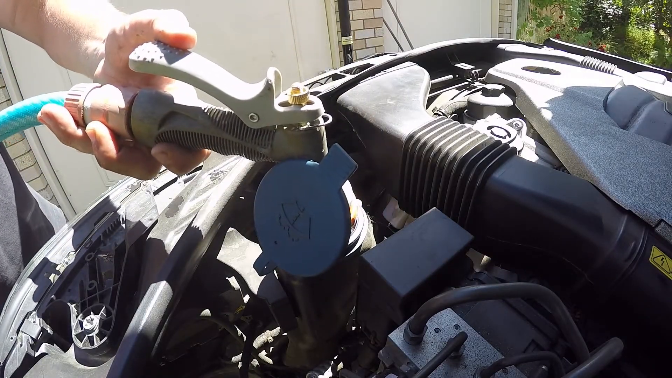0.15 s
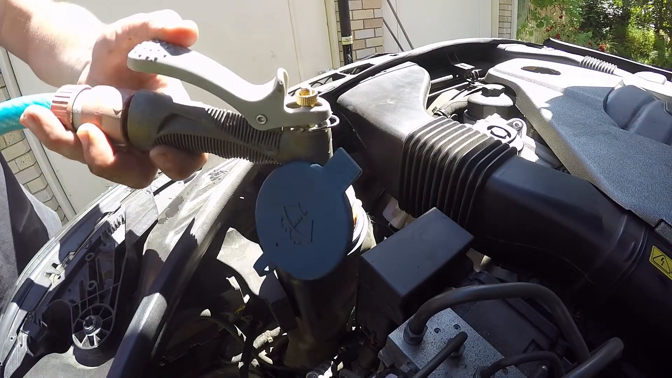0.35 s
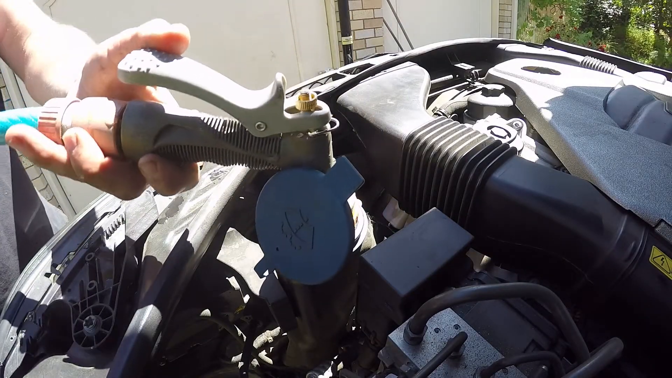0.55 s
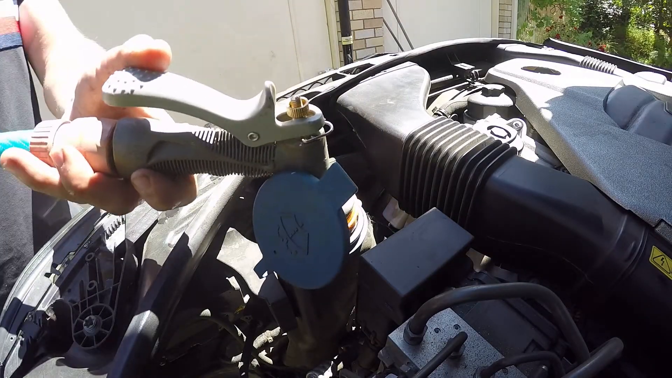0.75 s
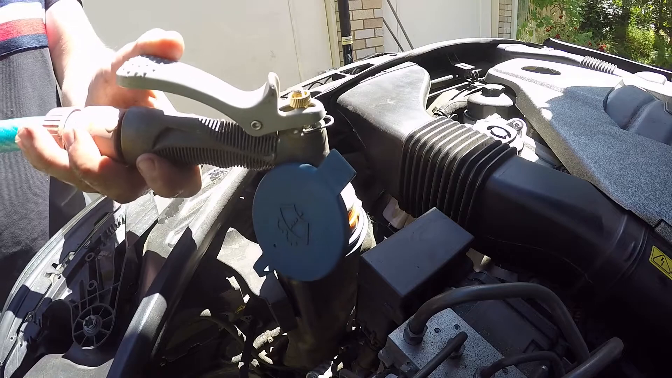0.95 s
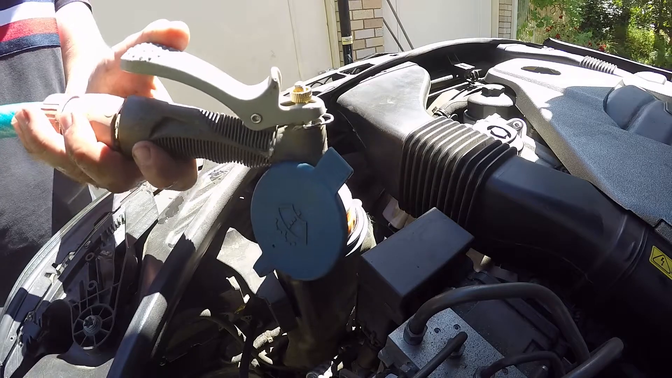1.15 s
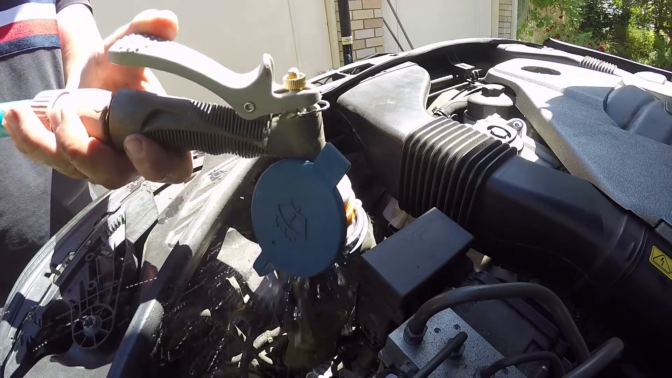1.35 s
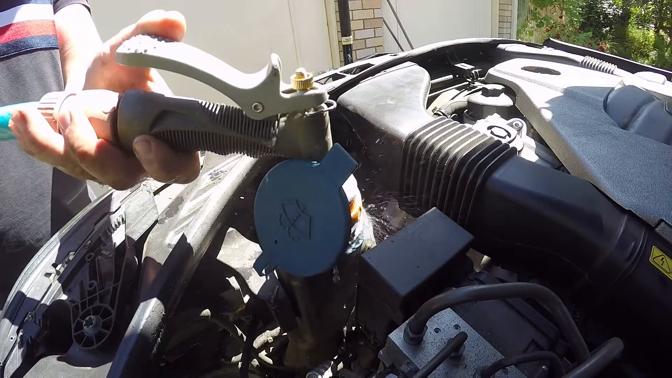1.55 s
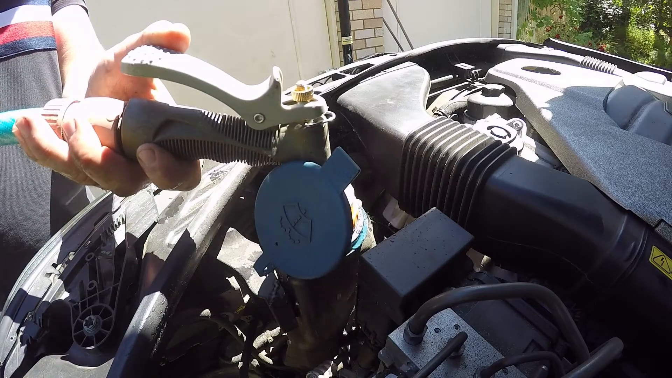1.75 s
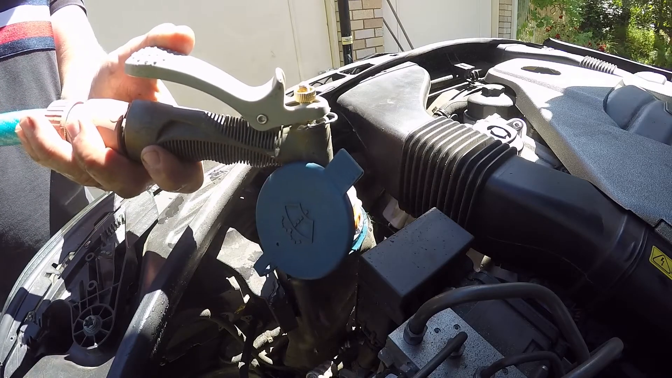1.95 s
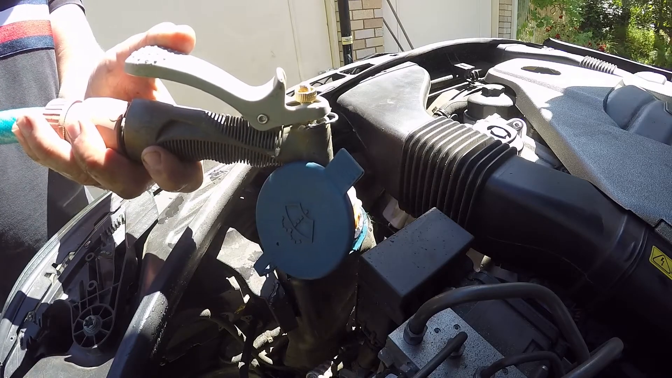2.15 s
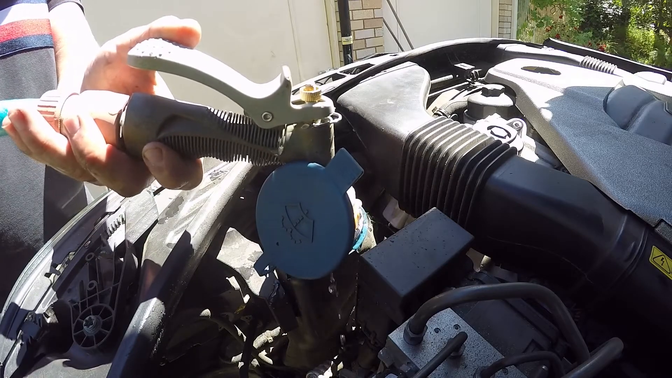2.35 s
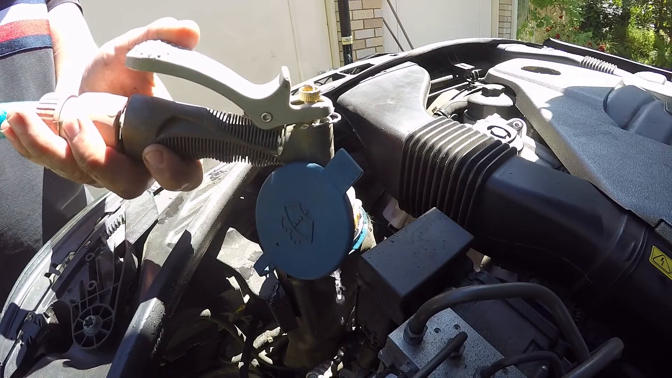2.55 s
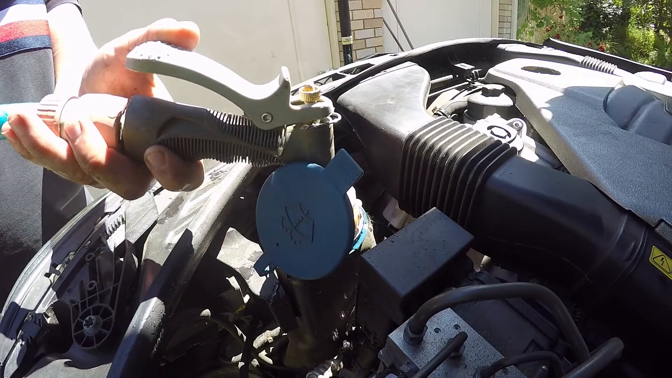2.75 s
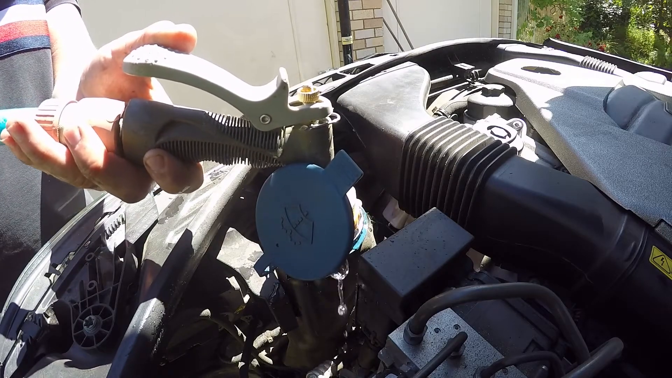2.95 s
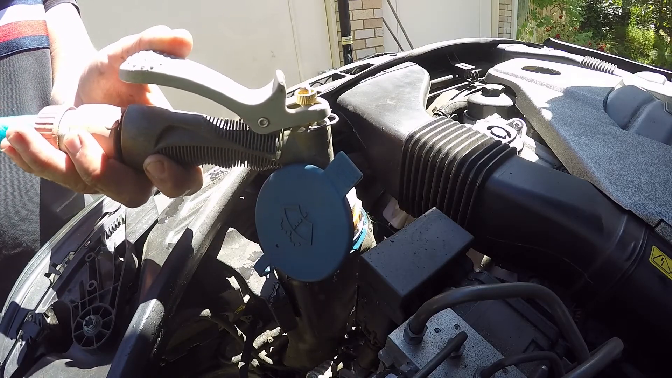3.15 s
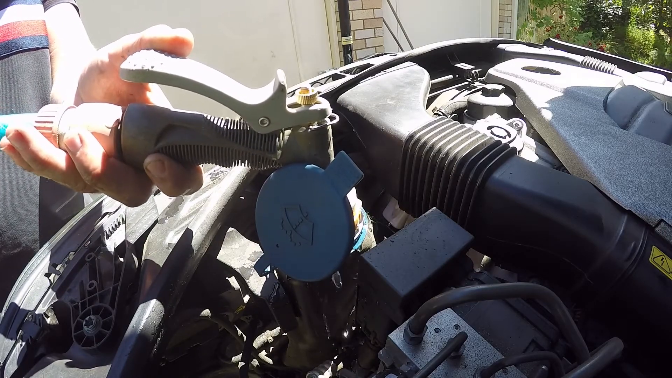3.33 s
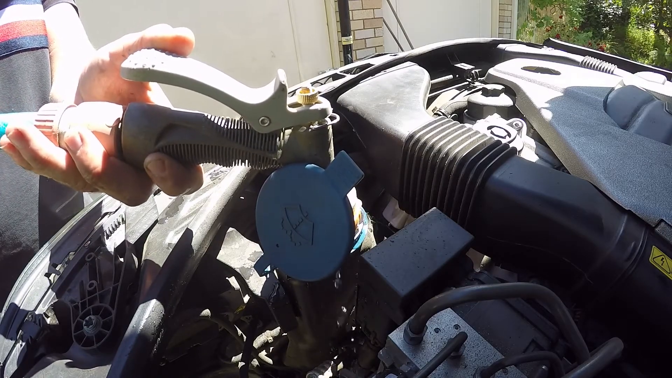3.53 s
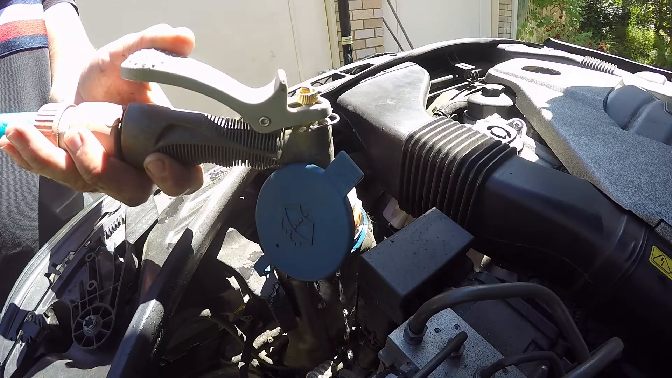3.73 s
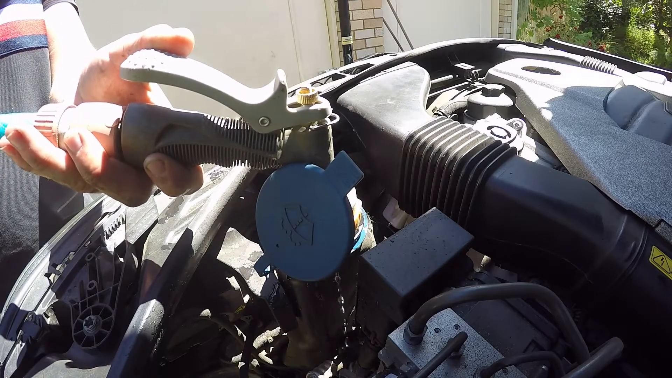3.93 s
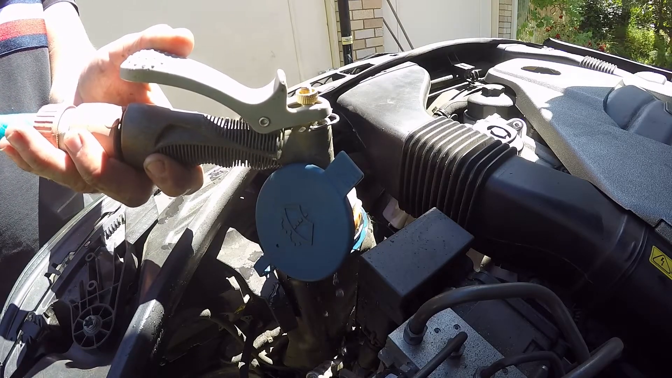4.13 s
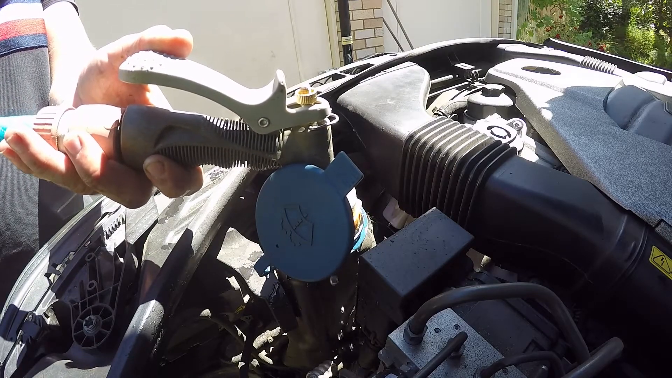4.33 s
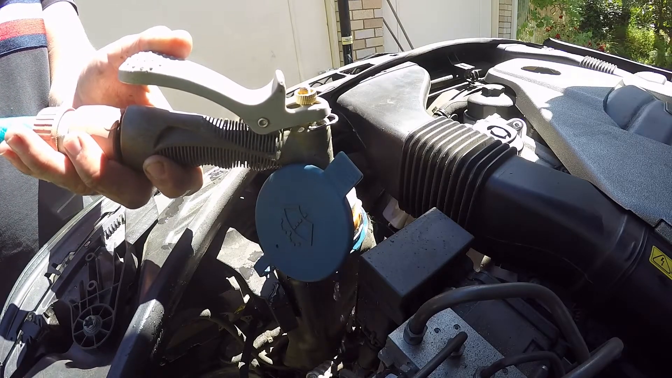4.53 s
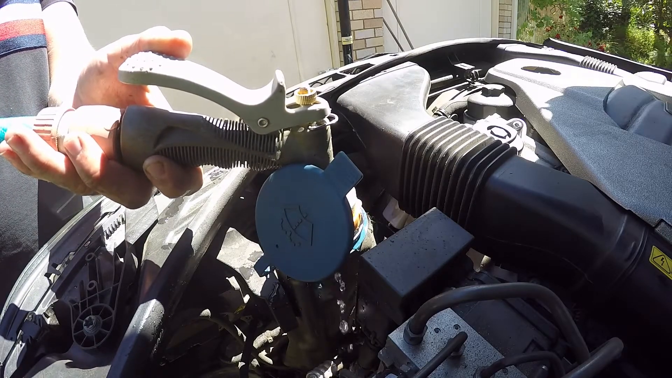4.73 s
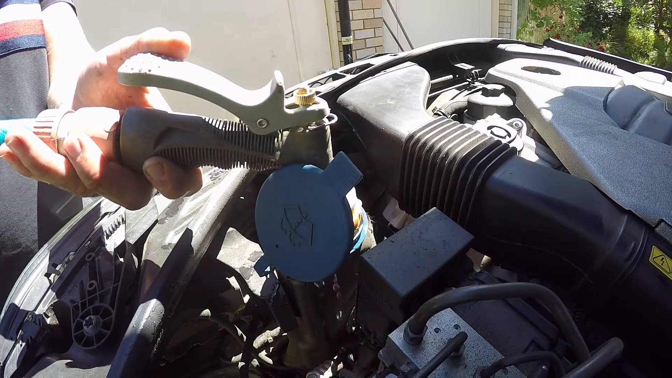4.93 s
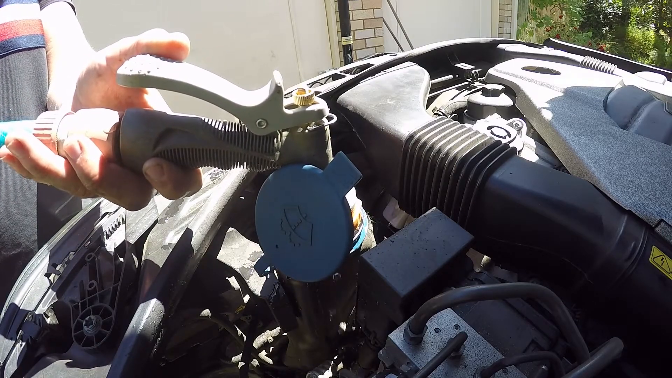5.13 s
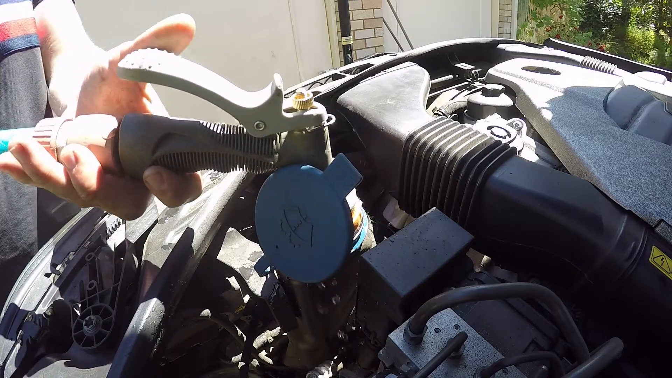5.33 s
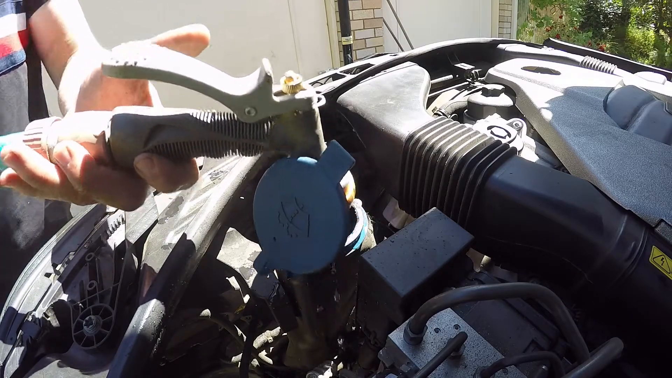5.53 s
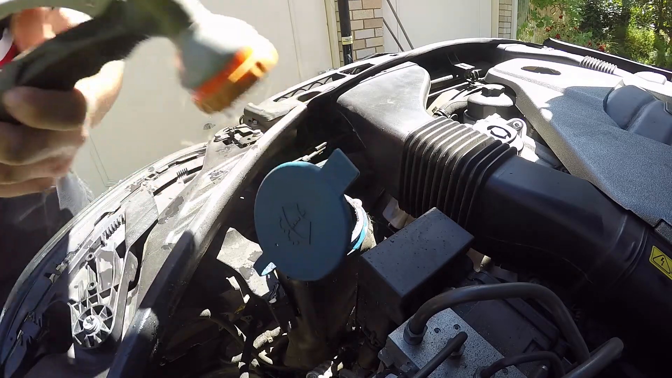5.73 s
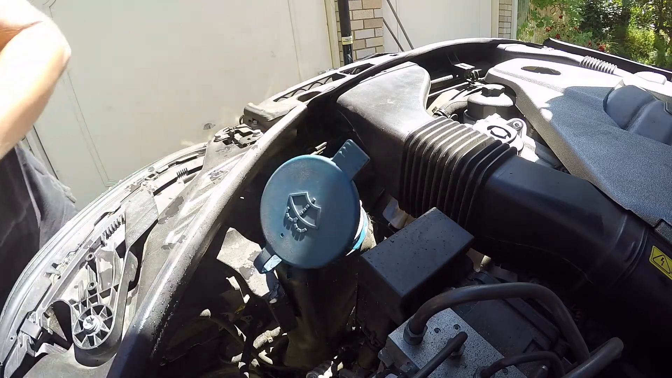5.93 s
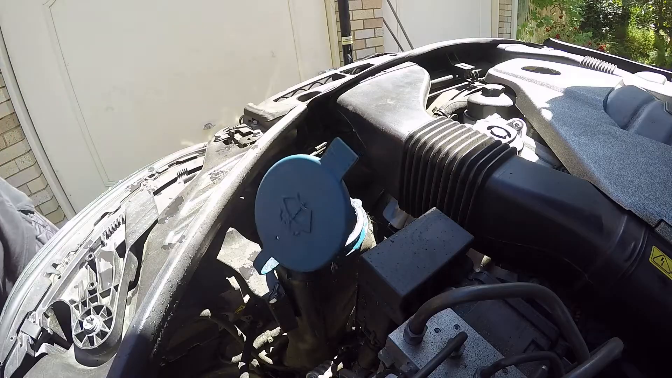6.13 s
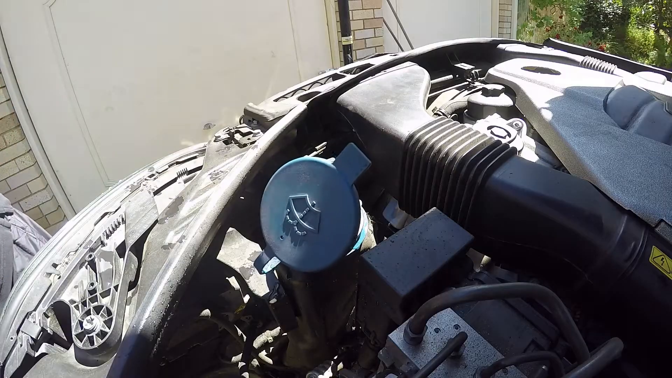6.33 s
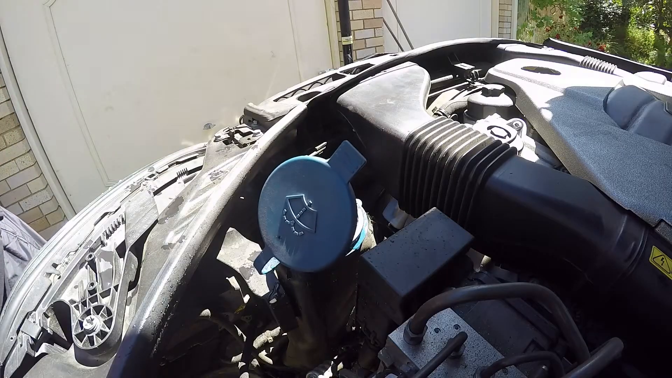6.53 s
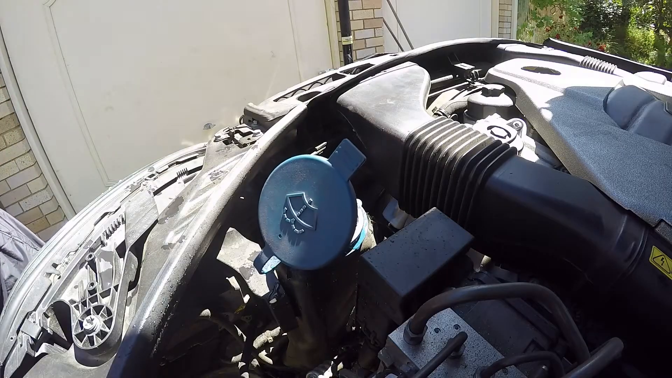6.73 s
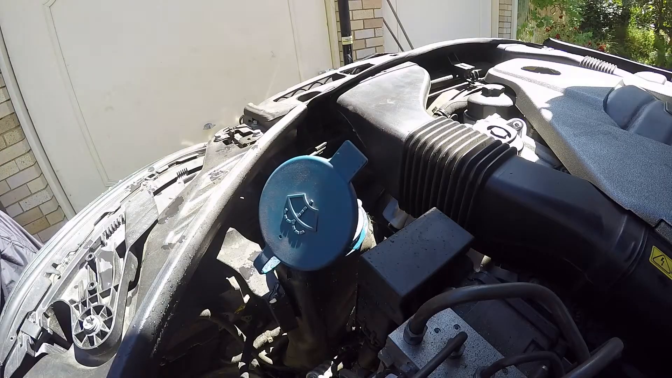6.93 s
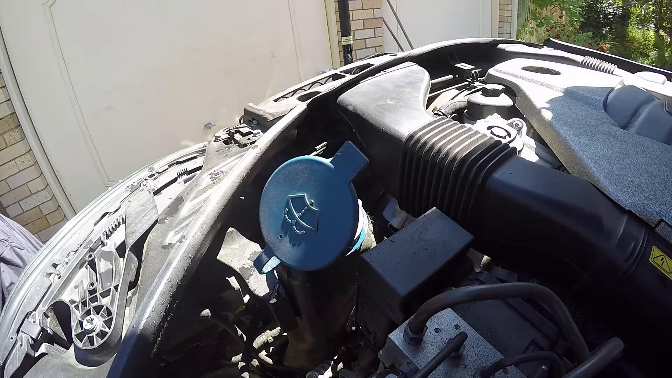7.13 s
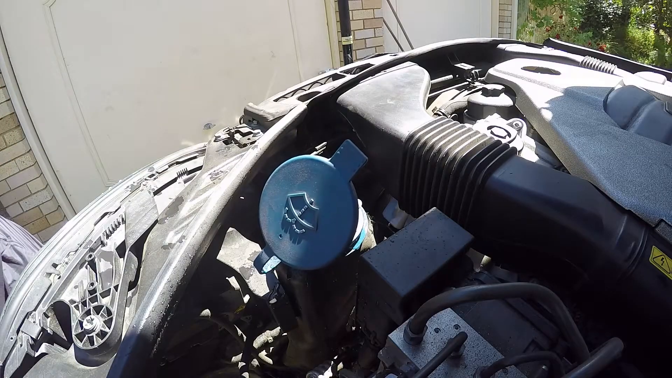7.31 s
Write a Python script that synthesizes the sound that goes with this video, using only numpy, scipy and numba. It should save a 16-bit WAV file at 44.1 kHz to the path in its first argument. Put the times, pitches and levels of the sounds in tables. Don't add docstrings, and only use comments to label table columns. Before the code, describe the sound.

Water hisses and bubbles down a narrow plastic neck, splashing loosely for a moment, then settling, then spitting brightly under more pressure. It cuts off abruptly with a short gulp, and the spray gun knocks and rattles against the tank while last drops patter. Near-silence remains: wavering low machine hum, a vehicle passing faintly, small bird chirps and a very faint cricket. Close small camera microphone, open yard, little echo.

```python
import sys
import numpy as np
from scipy import signal
from scipy.fft import rfft, irfft
from scipy.io import wavfile
from scipy.ndimage import uniform_filter1d
from numba import njit

SR = 44100
rng = np.random.default_rng(int(sys.argv[2]) if len(sys.argv) > 2 else 0)


def voltage_ratio(level):
    return 10 ** (np.asarray(level, float) / 20)


def digitize_waveform(pressure):
    field = np.atleast_2d(pressure).T
    bounded = np.clip(field, -1, 1)
    quanta = np.round(bounded * 32767).astype(np.int16)
    wavfile.write(sys.argv[1], SR, quanta)


N = 325017
TIME = np.arange(N) / SR

# frequency_hz, density_db
YARD = [(8.8, -35), (15, 1), (48, -5.5), (93, 2), (114, -6), (144, -12), (210, -14), (353, -19.5),
        (420, -21.5), (631, -27), (773, -26), (1690, -35.5), (4530, -37.5), (11800, -46), (15300, -50)]
# pitch_hz, drift_hz_per_s, trim_db, waver_db
HUM = [
    (100.54, -.36, -0.5, 1.26),
    (89.1, -.7, -0.4, 3),
]
# time_s, upper_db, lower_db
SWELL = [(0, -48, -62), (.3, -43.5, -46), (.8, -39.5, -53), (1.2, -41.5, -52), (1.4, -45.5, -52),
         (1.7, -41.5, -46), (2.3, -42.5, -49), (2.6, -44.5, -45.5), (2.95, -45, -43), (3.35, -40.5, -41),
         (3.8, -39, -45), (4.3, -46, -48), (4.7, -44, -44.5), (5.2, -42.5, -46), (5.55, -44.5, -40),
         (5.85, -58, -57), (6.6, -47.5, -47.5), (7.37, -45.5, -46)]
# time_s, firing_hz, level_db, upper_order_db
VEHICLE = [
    (3.8, 107, -70, -9),
    (4.3, 119.5, -63.5, 4),
    (4.8, 131.7, -53, -0.5),
    (5.2, 134, -63, -4),
    (5.5, 156, -50.5, -6),
    (5.7, 155, -67, -27),
    (6.2, 169.4, -60.5, -20),
    (7.37, 157, -78, -18),
]
# start_s, length_s, start_hz, end_hz, level_db
CHIRPS = [
    (5.526, 0.027, 2130, 2370, -57),
    (5.54, 0.021, 2350, 3000, -61),
    (6.37, 0.023, 2100, 2350, -61),
    (6.386, .012, 2350, 2750, -62),
    (6.452, .02, 2250, 2600, -67),
    (6.94, 0.04, 2020, 2860, -64),
]
# start_s, length_s, start_hz, end_hz, level_db
PEEPS = [
    (6.392, 0.013, 2764, 3150, -59),
    (6.968, 0.017, 2600, 3170, -58),
    (6.982, 0.024, 2700, 3550, -57),
    (6.984, 0.012, 4100, 4400, -55),
    (7.004, 0.0082, 4380, 4700, -61),
    (7.116, .022, 2250, 2550, -61),
    (7.135, .02, 2600, 2950, -65),
    (6.97, 0.015, 5300, 6200, -55),
]
# centre_hz, width_hz, level_db
WINGS = [(8600, 1900, -1), (12000, 2600, 1)]
# time_s, level_db
DRAG = [
    (5.93, -75),
    (6.0, -60),
    (6.1, -66),
    (6.16, -65),
    (6.22, -61),
    (6.3, -68),
]
# centre_hz, width_hz, level_db
DRAG_BODY = [(556, 290, 1), (850, 250, 1), (1600, 500, -6)]
# start_s, peak_db, pitch_hz, crack_db, tank_blow_db
KNOCKS = [(5.6032, -33.5, 1190, -1, -13), (5.6061, -27, 1510, -14, -14), (5.6437, -34, 2200, -1, -16),
          (5.7322, -33, 1350, 2, -7), (5.757, -34.5, 1340, -2, -13), (5.778, -40, 1280, -10, -7),
          (5.861, -36, 1100, -11, -14), (5.8663, -41, 1290, -10, -21), (5.741, -34, 1330, -20, -14),
          (5.747, -33, 1320, -20, -14), (5.787, -44, 1240, -20, -11), (5.65, -37, 2050, -15, -18),
          (6.221, -47, 1290, 9, -5), (6.227, -46, 1350, -6, -10)]
# start_s, peak_db, pitch_hz
TICKS = [(5.52, -41, 6190), (5.54, -46, 6500), (5.5644, -45, 5440), (5.5844, -41, 5530), (5.63, -45, 7200),
         (5.658, -36.5, 7000), (5.8172, -41, 5800), (5.847, -52, 5900), (5.9636, -41.5, 5960),
         (6.0147, -44, 8200), (6.0544, -56, 13160), (6.2198, -50, 7500), (6.2205, -52, 13000),
         (6.23, -54, 13500), (6.282, -55, 13000), (6.33, -60, 9500), (5.685, -50, 9500), (5.722, -50, 6000),
         (5.75, -47, 6500), (5.8, -45, 6000), (6.2314, -49, 5980), (6.2894, -53, 13400),
         (6.7715, -41, 6700), (6.773, -43, 13000), (6.7844, -45, 11500), (6.8, -56, 11000)]
# start_s, peak_db, pitch_hz
DROPS = [(5.490, -40, 1990), (5.4979, -33.5, 4100), (5.520, -49, 2000), (5.5691, -37, 2600),
         (5.571, -37, 4950), (5.588, -43, 3600), (5.610, -48, 3000), (5.655, -37, 2080),
         (5.6823, -35, 3750), (5.690, -42, 3700), (5.7324, -35, 3020), (5.745, -45, 4000),
         (5.7572, -42, 3200), (5.775, -42, 2200), (5.7771, -32, 4600), (5.8005, -38, 2670),
         (5.810, -44, 2600), (5.825, -41, 2600), (5.8904, -38.5, 4630), (5.9036, -36, 2220),
         (5.912, -42, 1700), (5.9637, -45, 2600), (6.1475, -38, 3870), (6.1887, -48, 1750),
         (6.0148, -47, 1100), (5.9627, -47, 1050), (5.62, -44, 1400), (5.665, -44, 1700),
         (5.635, -45, 3900), (5.835, -46, 2700), (6.155, -48, 2400), (6.2103, -36, 4900),
         (6.2213, -38, 3000), (6.228, -39, 2800), (6.2355, -45, 3200)]
# start_s, peak_db, pitch_hz, t60_s
CLUNKS = [(5.866, -40.5, 1000, .06), (5.867, -39, 465, .13), (5.867, -44, 382, .1), (5.872, -37, 641, .09),
          (5.872, -46, 830, .08), (5.895, -48, 630, .1), (5.735, -43, 463, .08), (5.604, -42, 960, .04),
          (5.862, -47, 1700, .07), (5.742, -42, 460, .07), (5.9, -48, 450, .08)]
# centre_hz, width_hz, level_db
TANK = [(458, 60, 5), (635, 50, -2), (950, 140, -5), (1330, 93, -6.5), (1690, 90, -3), (2230, 120, -20)]
# after_valve_s, length_s, start_hz, end_hz, peak_db
GULP = [
    (.0005, .008, 1480, 1280, -26),
    (.0055, .0085, 960, 860, -24.5),
    (.002, .014, 560, 500, -36),
]
# time_s, jet_db, dragged_air_db
FLOW = [(0.0, -42.5, 3), (0.5, -42.5, -4), (0.68, -41.5, -2.5), (0.93, -40.5, 0), (1.18, -42, -3),
        (1.31, -38, -4.5), (1.55, -39, -1.5), (1.66, -38, -4), (1.72, -40, 0), (1.98, -41.5, -7.5),
        (2.15, -42.5, -16), (2.46, -41.5, -23), (2.55, -42, -15), (3.15, -42, -5), (3.42, -42, 7),
        (3.6, -41, 0.5), (5.3, -42, -2.5), (5.46, -44.5, 7.5)]
# time_s, level_db
DREGS = [
    (5.47, -49),
    (5.724, -52.5),
    (5.906, -56),
    (6.0, -62),
    (6.18, -62),
    (6.22, -52),
    (6.28, -66),
]
# centre_hz, width_hz, level_db
NECK = [(1854, 240, 2), (2220, 96, 0.5), (2600, 39, 3.5), (2975, 124, 3), (3137, 270, 2), (3910, 120, 0),
        (4405, 210, 2), (6550, 470, -3), (7200, 1060, -6.5)]
# centre_hz, width_hz, level_db
NOZZLE = [(4400, 360, 8.5), (5130, 130, 4), (6420, 180, 0), (7340, 260, 5), (8200, 220, 2), (8700, 130, 1),
          (9860, 150, -2), (10780, 220, 2.5), (12100, 250, -1), (12500, 350, -3), (13430, 150, -1),
          (14150, 300, -1), (14500, 150, -3), (14950, 500, -7)]
# centre_hz, width_hz, level_db
CRACKLE = [(10600, 5900, 0)]
# frequency_hz, density_db
JET = [(180, -53), (300, -27.5), (390, -8), (754, -11.5), (1340, -11.5), (3100, -12.5), (3660, -14.5),
       (4380, -12.5), (12000, -23), (15300, -31)]
# time_s, first_hz, second_hz, second_over_first_db
AIR = [
    (0, 424, 850, -1),
    (.5, 390, 903, 6.5),
    (.6, 390, 810, 7.5),
    (1.05, 360, 820, 2),
    (1.28, 410, 850, 0),
    (1.7, 436, 862, 2),
    (2.1, 453, 860, 11.5),
    (3.4, 505, 920, -0.5),
    (5.46, 500, 890, -2),
]
# time_s, pitch_hz, trim_db
THIRD = [(0, 1340, 2), (.15, 1300, 1), (.35, 1330, -0.5), (.6, 1330, -3), (.95, 1340, -1), (1.2, 1340, -8),
         (1.3, 1235, 2), (1.6, 1240, -1), (1.9, 1310, -1), (2.2, 1340, 1.5), (2.9, 1334, -0.5),
         (3.25, 1336, 0.5), (3.42, 1330, 1.5), (3.6, 1323, 1), (4.2, 1344, 2), (4.6, 1337, -1),
         (5.1, 1335, -1), (5.46, 1320, 0)]
# start_s, peak_db, pitch_hz
BUBBLES = [(0.168, -33.5, 1254), (.192, -35, 1230), (.2, -37, 870), (0.237, -38, 887), (.245, -42, 1270),
           (.275, -38, 878), (0.398, -36, 930), (.53, -45, 920), (0.585, -43, 830), (.645, -35, 782),
           (0.715, -36, 1310), (.775, -34, 854), (0.868, -37, 860), (0.905, -41, 1430), (.99, -40, 794),
           (1.008, -43, 1360), (1.071, -38, 1330), (1.142, -41, 970), (1.435, -41, 1280),
           (1.721, -36, 1540), (1.87, -43, 1260), (1.33, -40, 423), (1.385, -43, 433), (1.45, -39, 430),
           (1.66, -38, 440), (1.75, -39, 400), (1.52, -39, 423), (1.575, -39, 428), (1.615, -36, 442),
           (1.262, -37, 1280), (1.41, -39, 1230)]
# start_s, length_s, start_hz, end_hz, peak_db
POCKETS = [
    (2.1335, .008, 2180, 1420, -25.5),
    (2.140, .008, 1320, 1900, -30),
    (2.1405, .004, 1800, 2350, -32),
    (1.928, .011, 2450, 2750, -36),
    (3.86, .008, 480, 760, -34),
    (2.136, .008, 1300, 1050, -36),
]
# start_s, peak_db
SPITS = [(3.4907, -31), (3.5142, -31), (3.522, -32), (3.532, -34), (3.571, -33), (3.63, -35), (3.865, -34),
         (3.5501, -30), (3.579, -31), (3.597, -33), (3.6623, -36), (3.6713, -35), (3.7122, -35),
         (3.7257, -33), (3.7841, -37), (3.834, -35), (3.8469, -33), (3.8754, -32), (3.9377, -32),
         (3.9716, -34), (4.024, -33), (4.057, -30), (4.1318, -36), (4.1926, -32), (4.2131, -34),
         (4.24, -33), (4.269, -37), (4.3378, -34), (4.3807, -35), (4.496, -34), (4.6391, -33),
         (4.7519, -33), (4.7738, -31), (4.8192, -34), (4.8551, -39), (4.8671, -35), (4.8856, -30),
         (4.9544, -37), (4.9634, -34), (5.0048, -31), (5.0367, -30), (5.0721, -35), (5.1485, -34),
         (5.1924, -33), (5.2188, -34)]
# start_s, peak_db, pitch_hz, width_over_pitch
SPLASHES = [(.049, -26, 8400, 0.65), (0.117, -26.5, 8900, .7), (.387, -31.5, 2500, 0.56),
            (.912, -30, 2260, .3), (.954, -32, 3750, 0.3), (1.009, -35, 9000, .8), (1.511, -33, 1510, 0.16),
            (1.627, -33, 1700, 0.08), (1.57, -35, 2650, .12), (1.605, -34, 2600, .15),
            (1.651, -27, 4000, 0.4), (1.655, -34, 2230, .15), (2.15, -37, 1500, 0.33),
            (2.465, -34, 5250, 0.31), (3.671, -28, 8300, 0.5), (1.53, -35, 4400, 0.13),
            (1.612, -28, 4500, .3), (1.661, -28.5, 3400, 0.27), (1.675, -29, 4300, .25),
            (1.31, -37, 2950, .12), (.69, -36, 2170, 0.13), (.73, -37, 1800, .2), (.745, -37, 2670, 0.13),
            (0.802, -36, 2600, 0.13), (.855, -38, 2600, 0.14), (.87, -37, 2000, .2), (.515, -39, 3000, .12)]

SPILL_S, SPILL_END_S, TRIGGER_S, VALVE_S = 1.25, 1.93, 3.43, 5.4603
SPILL_DB = -2


def level(x, db):
    return x * voltage_ratio(db) / np.sqrt(np.mean(x ** 2))


def curves(table):
    s, *columns = np.transpose(table)
    inside = 1. * ((TIME >= s[0]) & (TIME <= s[-1]))
    gate = uniform_filter1d(inside, size=200, mode="nearest")
    return [np.interp(TIME, s, c) for c in columns] + [gate]


@njit
def svf(x, hz, width):
    y, b, l = np.empty(len(x)), 0., 0.
    for i in range(len(x)):
        g, k = np.tan(np.pi * hz[i] / SR), width / hz[i]
        v = (b + g * (x[i] - l)) / (1 + g * (g + k))
        b, l, y[i] = 2 * v - b, l + 2 * g * v, k * v
    return y


def ring(x, modes):
    out = 0
    for k, (hz, width, db) in enumerate(modes):
        out = out + (-1) ** k * voltage_ratio(db) * svf(x, np.full(len(x), 1. * hz), 1. * width)
    return out


def colour(x, spectrum):
    hz, db = np.transpose(spectrum)
    grid = np.log(np.arange(N // 2 + 1) * SR / N + 1)
    return irfft(rfft(x) * voltage_ratio(np.interp(grid, np.log(hz), db)), N)


def walk(rate):
    k = int(SR / rate)
    held = np.repeat(rng.standard_normal(N // k + 1), k)
    return 1.322 * uniform_filter1d(uniform_filter1d(held, k), k)[:N]


def droplets(share, spread_db, tail_s):
    when = rng.random(N)
    size = voltage_ratio(spread_db * np.minimum(rng.exponential(size=N), 5))
    power = signal.lfilter([1], [1, -np.exp(-1 / (tail_s * SR))], (when < share) * size ** 2)
    return level(np.sqrt(power) * rng.standard_normal(N), 0)


def add(out, s, sound):
    i = int(s * SR)
    out[i:i + len(sound)] += sound[:N - i]


def burst(hz, t60, width):
    t = TIME[:8192]
    centre = min(hz, 15e3) + 0 * t
    contact = 1 + 1.6 * np.exp(-t / 0.00013)
    push = rng.standard_normal(len(t)) * voltage_ratio(-60 * t / t60) * contact
    x = svf(svf(push, centre, width * hz), centre, width * hz)
    return x / np.abs(x).max()


def glide(length, from_hz, to_hz, bend):
    hz = to_hz + (from_hz - to_hz) * np.linspace(1, 0, int(length * SR)) ** bend
    return 2 * np.pi * np.cumsum(hz) / SR, np.hanning(len(hz))


def yard():
    air = colour(rng.standard_normal(N), YARD)
    above = signal.sosfilt(signal.butter(4, 120, "high", fs=SR, output="sos"), air)
    return air * voltage_ratio(-52.5 + 0.14 * walk(4.0)) / np.std(above)


def tone(hz, db, waver_db):
    pitch = hz * (1 + 0.00965 * walk(7.3))
    phase = 2 * np.pi * np.cumsum(pitch) / SR
    return np.sqrt(2) * np.sin(phase) * voltage_ratio(db + waver_db * walk(5.5))


def machine():
    upper_db, lower_db, _ = curves(SWELL)
    out = tone(26.3 + 0 * TIME, -52, 2.5)
    for (hz, drift, trim_db, waver_db), swell_db in zip(HUM, (upper_db, lower_db)):
        out += tone(hz + drift * TIME, trim_db + swell_db, waver_db)
    return out


def vehicle():
    hz, db, upper_db, gate = curves(VEHICLE)
    firing = rng.standard_normal(N)
    lower = level(svf(firing, hz, 4.3), 0)
    upper = level(svf(firing, 1.515 * hz, 11.0), 0)
    return (lower + voltage_ratio(upper_db) * upper) * voltage_ratio(db) * gate


def cricket():
    start_s, every_s = 6.464, .2036
    since = (TIME - start_s) % every_s
    rasp = np.exp(-since / .04) * (1 - np.exp(-since / .01)) * (TIME > start_s) * voltage_ratio(.8 * walk(60))
    strokes = ring(ring(droplets(0.079, 1.9, 0.0011), WINGS), WINGS)
    return level(strokes * rasp, -81)


def birds():
    out = np.zeros(N)
    for notes, octave_db in ((CHIRPS, 4.5), (PEEPS, -20)):
        for s, length, from_hz, to_hz, db in notes:
            phase, window = glide(length, from_hz, to_hz, .75)
            voice = np.sin(phase) + voltage_ratio(octave_db) * np.sin(2 * phase)
            add(out, s, voltage_ratio(db) * window ** .6 * voice)
    out = out * voltage_ratio(-1.5) * (1 + .3 * walk(500))
    t = TIME[:4000]
    leaves = rng.standard_normal(len(t)) * np.exp(-t / .025) * (t > .008)
    return out + voltage_ratio(-8) * signal.fftconvolve(out, leaves / np.linalg.norm(leaves))[:N]


def drag():
    db, gate = curves(DRAG)
    return level(ring(droplets(0.0092, 2, .006), DRAG_BODY), 0) * voltage_ratio(db) * gate


def clunk(hz, t60):
    t = TIME[:16384]
    return np.sin(2 * np.pi * hz * t) * (1 - np.exp(-t / 0.001)) * voltage_ratio(-60 * t / t60)


def gun():
    out, blows = np.zeros(N), np.zeros(N)
    add(out, VALVE_S, voltage_ratio(-21.5) * burst(1200, 0.036, 2.9))
    for s, db, hz, crack_db, tank_db in KNOCKS:
        body = 0.56 * burst(hz, 50 / hz, 0.24)
        add(out, s, voltage_ratio(db) * (body + voltage_ratio(crack_db) * burst(2500, 0.016, 1.3)))
        blow = 0.33 * burst(620, 0.063, 3.5) + 2.9 * np.exp(-TIME[:8192] / 0.00013)
        add(blows, s, voltage_ratio(db + tank_db + 10.5) * blow)
    for s, db, hz in DROPS:
        add(out, s, voltage_ratio(db - 5.5) * (burst(hz, 0.034, 0.25) + 0.5 * burst(hz, 0.016, 1.5)))
    for s, db, hz in TICKS:
        add(out, s, voltage_ratio(db - 1.5) * burst(hz, 0.044, 0.66))
    for s, db, hz, t60 in CLUNKS:
        add(out, s, voltage_ratio(db) * clunk(hz, t60))
    return out + ring(blows, TANK)


def bay(near):
    t = TIME[:6000]
    echoes = rng.standard_normal(len(t)) * voltage_ratio(-60 * t / 0.22) * (t > .002)
    return near + voltage_ratio(-35.5) * signal.fftconvolve(near, echoes)[:N]


def gulp():
    out = np.zeros(N)
    for after, length, from_hz, to_hz, db in GULP:
        phase, window = glide(length, from_hz, to_hz, 1)
        add(out, VALVE_S + after, voltage_ratio(db) * np.sin(phase) * window ** .5)
    return out


def dregs():
    db, gate = curves(DREGS)
    run = ring(droplets(.02, 2.5, .004), [(1500, 1500, 0), (4200, 3000, -5)])
    patter = ring(droplets(0.0045, 2.2, 0.0022), [(2300, 2200, -1), (4300, 1500, 1.0), (7000, 3000, -10)])
    out = level(run, -5.5) * voltage_ratio(db + 2.5 * walk(30)) * gate
    return out + level(patter, -10.5) * voltage_ratio(db) * gate


def hiss(loose):
    neck = level(ring(droplets(0.033, 0.5, 0.0012), NECK), -4.0)
    jet = level(colour(droplets(0.033, 0.95, 0.0019), JET), -0.11)
    return neck * voltage_ratio(1.28 + SPILL_DB * loose) + jet


def gurgle():
    first_hz, second_hz, second_db, _ = curves(AIR)
    bubbles = droplets(0.03, .9, 0.01)
    first = svf(svf(bubbles, first_hz, 200.0), first_hz * (1 + 0.019 * walk(12)), 72.0)
    second = svf(svf(bubbles, second_hz, 210.0), second_hz * (1 + 0.021 * walk(15)), 73.0)
    extra_hz = 1030 + 0 * TIME
    extra = svf(svf(bubbles, extra_hz, 150.0), extra_hz, 58.0)
    early = np.clip(SPILL_END_S + .5 - TIME, 0, 1)
    return level(first - voltage_ratio(second_db) * second + voltage_ratio(1.0) * early * extra, -4.5)


def piping(third_hz):
    breath = svf(droplets(0.067, 0.5, 0.0079), third_hz, 320.0)
    return level(svf(breath, third_hz * (1 + 0.0063 * walk(9)), 150.0), -1.56)


def spit(hard):
    singing = level(ring(droplets(0.015, 2.1, 0.0021), NOZZLE), -3.5)
    crackle = level(ring(ring(droplets(0.0037, 1.9, 0.00058), CRACKLE), CRACKLE), -8.5)
    spray = level(ring(droplets(0.018, 3.6, 0.0014), [(9900, 16000, 0)]), -5.5)
    return hard * (singing + crackle) + (1 - 0.64 * hard) * spray


def stream():
    jet_db, air_db, gate = curves(FLOW)
    third_hz, third_db, _ = curves(THIRD)
    slide_s = .12
    loose = np.clip(np.minimum(TIME - SPILL_S, SPILL_END_S - TIME) / slide_s + .5, 0, 1)
    hard = np.clip((TIME - TRIGGER_S) / 0.036, 0, 1)
    piping_db = -4.5 + 0.26 * air_db + 0.5 * hard + SPILL_DB * loose + third_db
    opening_db = 5 * np.exp(-(TIME / 0.27) ** 2)
    weakening = (1 - hard) * np.clip((TIME - SPILL_END_S) / (TRIGGER_S - SPILL_END_S), 0, 1)
    spit_db = -4.5 + 0.23 * air_db + 3.5 * hard + opening_db - 2 * weakening
    out = hiss(loose) * voltage_ratio(0.55 * walk(12))
    out += gurgle() * voltage_ratio(air_db - 1.5 + .6 * walk(35))
    out += piping(third_hz) * voltage_ratio(piping_db)
    out += spit(hard) * voltage_ratio(spit_db + 0.14 * walk(12))
    return out * voltage_ratio(jet_db) * gate


def water():
    out = stream() + dregs()
    for s, db, hz in BUBBLES:
        phase, window = glide(28 / hz, hz, hz * 1.03, 0.89)
        add(out, s - .004, voltage_ratio(db - 3) * np.sin(phase) * window)
    for s, length, from_hz, to_hz, db in POCKETS:
        phase, window = glide(length, from_hz, to_hz, 1)
        add(out, s, voltage_ratio(db) * np.sin(phase) * window)
    for s, db in SPITS:
        add(out, s, voltage_ratio(db) * burst(10400, 0.028, .3))
    for s, db, hz, width in SPLASHES:
        add(out, s, voltage_ratio(db) * burst(hz, 0.044 + 29 / hz, width))
    return out


def scene():
    background = yard() + machine() + vehicle() + cricket()
    near = birds() + drag() + gun()
    return (background + bay(near) + gulp() + water())[None]


def low_pass(x):
    return signal.sosfilt(signal.butter(12, 15290, fs=SR, output="sos"), x)


def record(dry):
    mix = signal.sosfilt(signal.ellip(10, .2, 80, 15280, fs=SR, output="sos"), dry)
    return low_pass(mix)


dry = scene()
out = record(dry)
digitize_waveform(out)
```